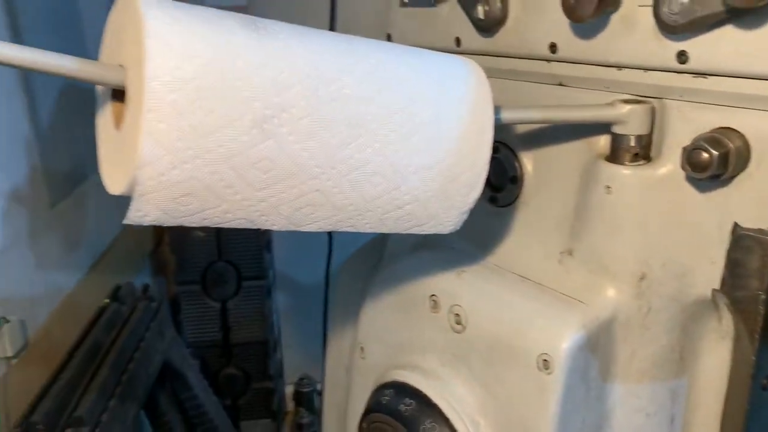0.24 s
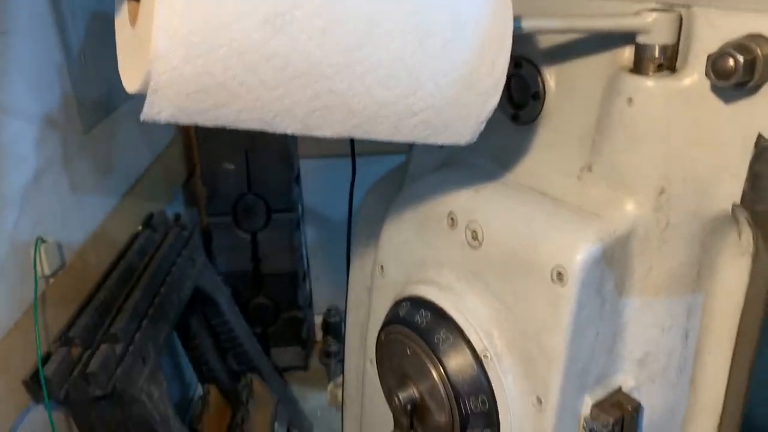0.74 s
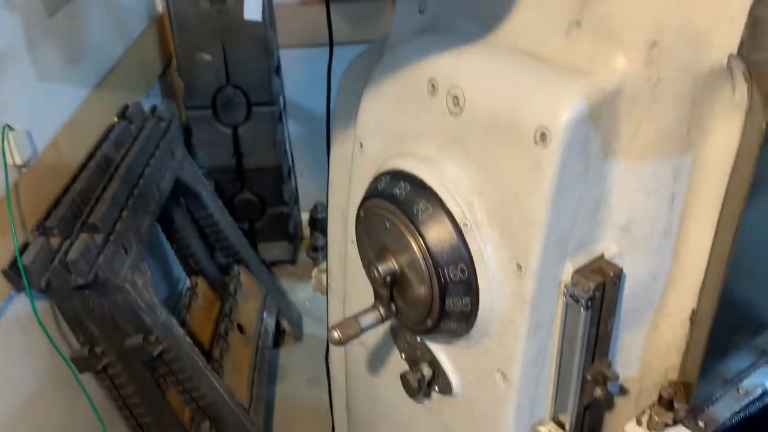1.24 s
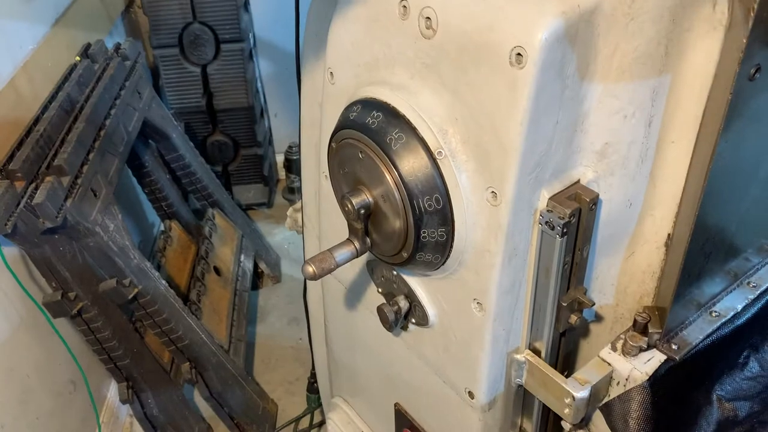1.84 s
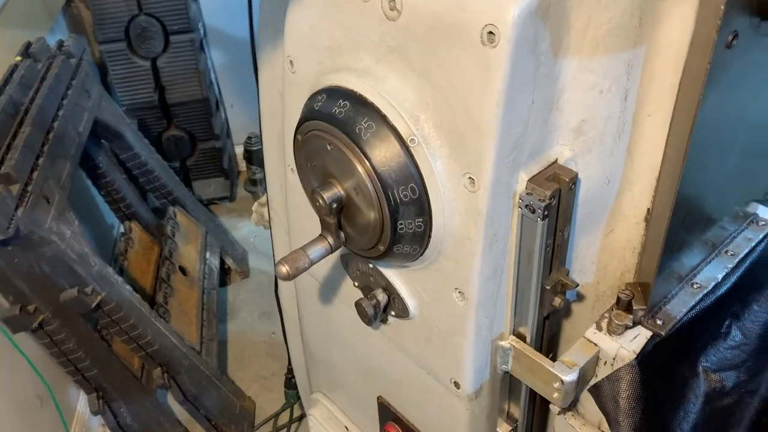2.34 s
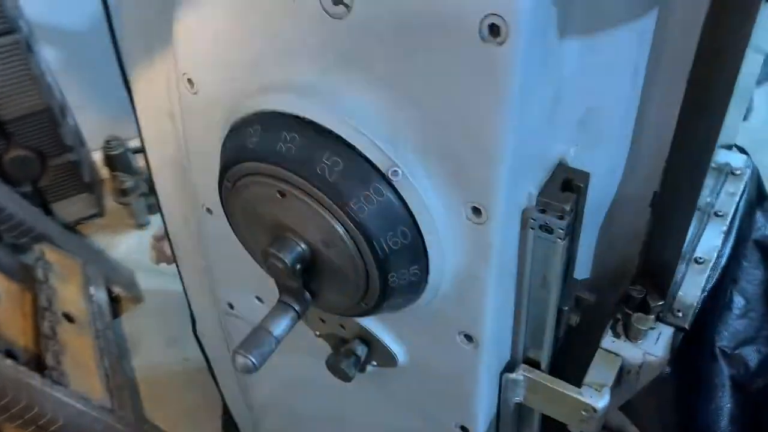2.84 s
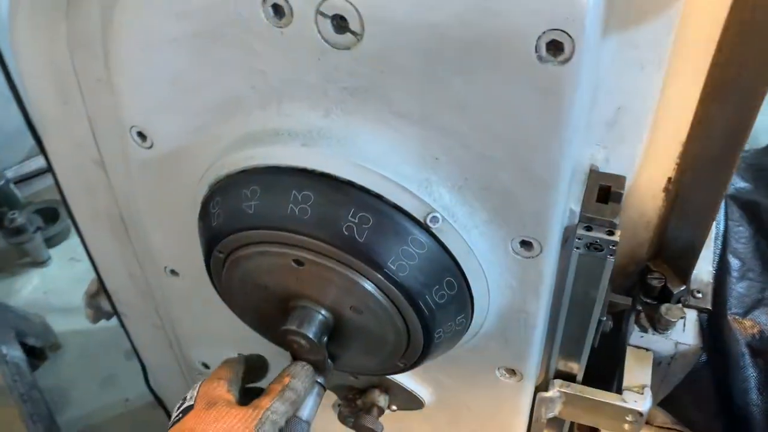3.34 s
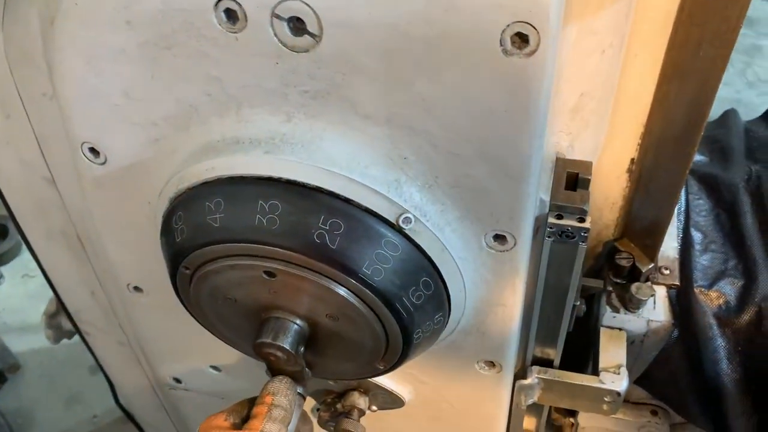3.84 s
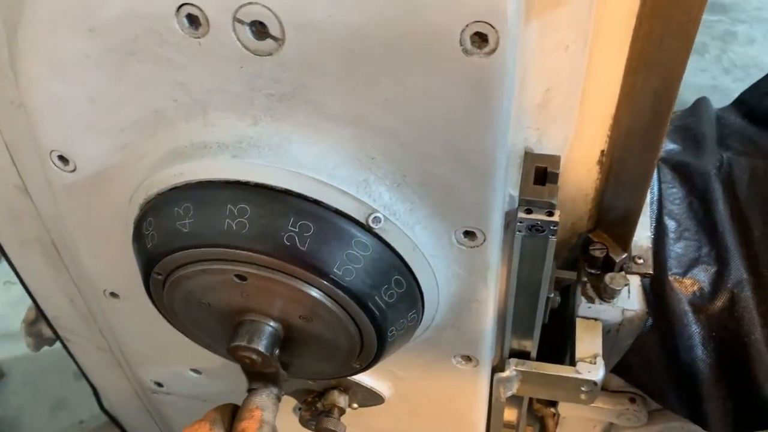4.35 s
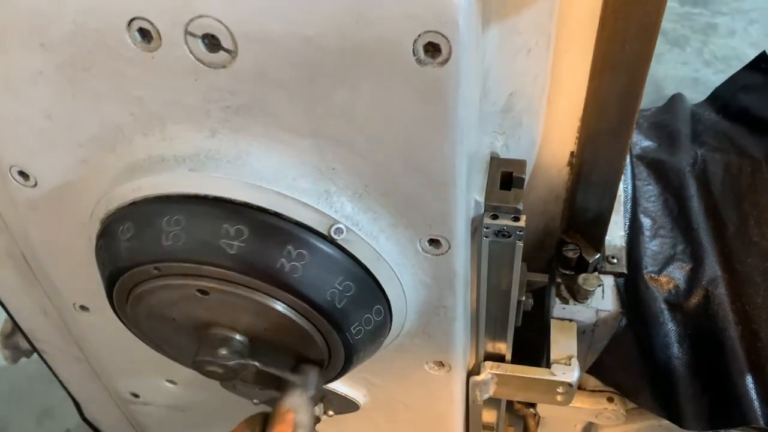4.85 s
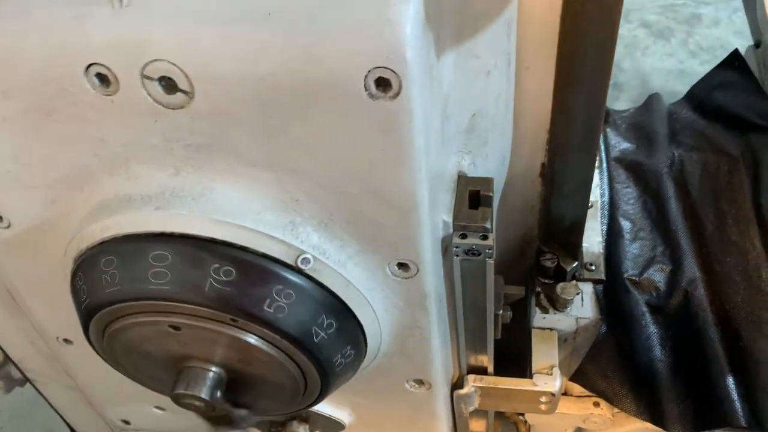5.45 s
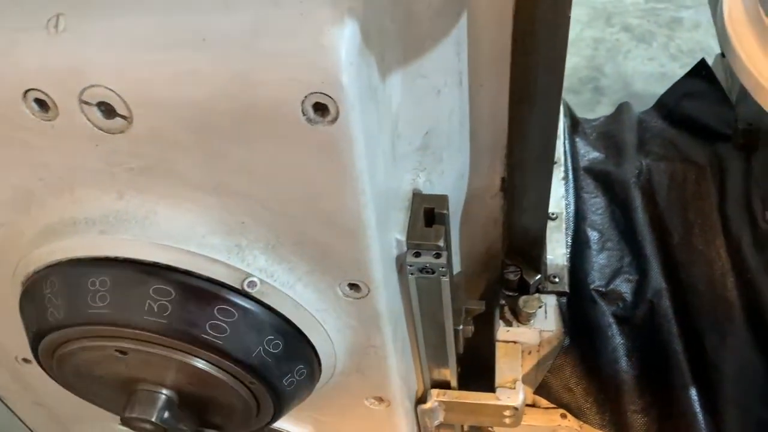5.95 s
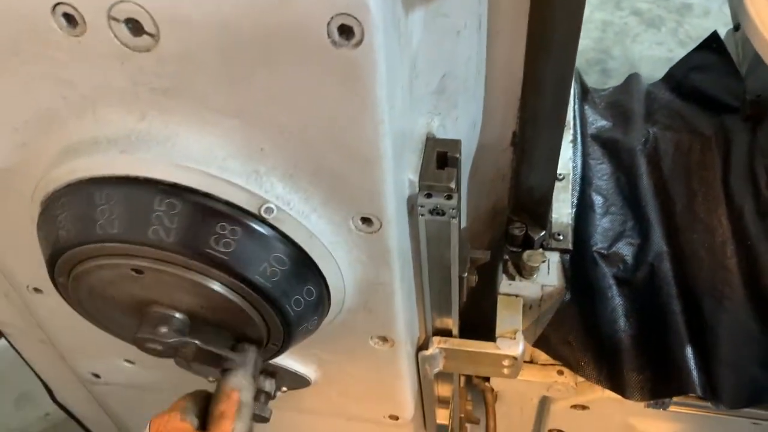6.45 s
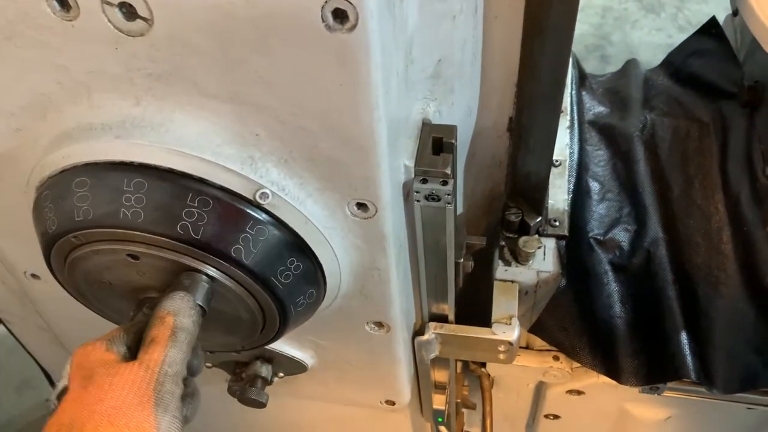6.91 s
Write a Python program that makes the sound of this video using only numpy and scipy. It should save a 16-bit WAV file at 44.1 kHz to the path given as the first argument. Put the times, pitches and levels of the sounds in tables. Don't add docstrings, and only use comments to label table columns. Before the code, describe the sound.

A geared milling machine idles throughout in a small workshop, close and loud on a handheld stereo microphone. A dense mid-range roar carries several steady singing gear tones, pulsing slightly with each shaft turn, while a thin high motor whine swells and fades unevenly. A belt joint gives short, bright puffs of air about every 0.2 seconds, partly masked at first and clearer as the microphone is lowered during the first 2.5 seconds. Around 2.5 to 3 seconds it steps closer and the tone balance shifts. A faint metallic touch comes at 2.9, then a glove rubs briefly at 3.3. A dry crack sounds at 4.0, the loudest steel clink at 5.0 with a short rub after it, faint ticks and rattles with a soft rub near 6.1, and a last loud clink at 6.65 followed by another rub. The machine keeps running unchanged to the end, around 7.2 seconds.

```python
import sys
import numpy as np
from scipy import signal
from scipy.fft import rfft, irfft
from scipy.io import wavfile
from scipy.ndimage import uniform_filter1d

SR = 44100
rng = np.random.default_rng(int(sys.argv[2]) if len(sys.argv) > 2 else 0)


def gain_from_db(level_db):
    decades = np.asarray(level_db, float) / 20
    return 10 ** decades


def output_pcm(signal):
    pcm = np.clip(np.atleast_2d(signal).T, -1, 1) * 32767
    wavfile.write(sys.argv[1], SR, np.round(pcm).astype(np.int16))


N = 316638
TURN = 3780

MESH_ORDERS = [21, 42, 49, 68, 98]
# pitch_hz [Hz], share [0-1]
REPEATS = [(100, 0.14), (300, 0.35), (700, 0.22), (1200, 0.28), (1800, 0.05), (2400, 0.42), (3200, 0.05),
           (4500, 0.37)]


def evened(x):
    return x / np.sqrt(np.mean(abs(x) ** 2) + 1e-20)


def read(points, hz):
    f, value = np.transpose(points)
    return np.interp(np.log(hz + 1), np.log(f + 1), value)


def add(mix, s, sound):
    part = mix[round(s * SR):][:len(sound)]
    part += sound[:len(part)]


def band(x, lo_hz, hi_hz):
    return signal.sosfilt(signal.butter(2, [lo_hz, min(hi_hz, SR / 2.1)], "band", fs=SR, output="sos"), x)


def bump(t, s, width_s):
    return np.exp(-((t - s) / width_s) ** 2)


def spot(t):
    # time_s [s], spot [0-3]
    walk = [
        (0, 0),
        (1.0, .5),
        (2.45, 1),
        (3.1, 2),
        (4.6, 2.1),
        (6.2, 3),
        (7.18, 3),
    ]
    return np.interp(t, *np.transpose(walk))


def between(values, t):
    return np.interp(spot(t), np.arange(len(values)), values)


def place_db(t, hz):
    corner_hz = [130, 500, 800, 1200, 1500, 2000, 4500, 9000]
    close_db = [2, 0, 0.5, -2, 0, 0, -.5, -1]
    turned_db = [0.17, 0.074, 0.11, 1.5, 1.6, 0.61, 0.27, 0]
    stepping_db = [1.5, 0, -2, 3.5, 1.5, 2.5, 1, 3]
    close = np.clip(spot(t) - 1, 0, 1) - .5
    turned = np.clip(spot(t) - 2, 0, 1)
    stepping = bump(t, 2.7, .3)
    curves = ((close, close_db), (turned, turned_db), (stepping, stepping_db))
    return sum(np.outer(amount, np.interp(hz, corner_hz, db)) for amount, db in curves)


def field(t, hz):
    # pitch_hz [Hz], level_db [dB per Hz]
    roar_curve = [(40, -87), (58, -62), (200, -62), (400, -57), (900, -59.5), (1600, -59.5), (2100, -61.5),
                  (2700, -66), (3500, -70.5), (5000, -81), (7500, -89), (9500, -97), (12700, -100),
                  (15500, -114)]
    # pitch_hz [Hz], width_hz [Hz], level_db [dB over the roar]
    panels = [(81.6, 13, 7), (102, 12.5, -8.5), (165.5, 40, 3), (390, 104, 2.5), (482, 19, 4),
              (788.6, 28, 10.5), (1011, 54, 6), (1187, 23, 14.5), (1292, 48, 7.5), (1680, 120, 0.5),
              (1620, 14, 0.5), (1881, 41, 7.5), (1977.6, 25, 7), (2264, 57, 5), (2385, 33, 9),
              (2541, 27, -0.5), (2600, 32, 5.5), (5950, 250, 0)]
    # pitch_hz [Hz], level_db [dB]
    lean = [(60, 1), (200, -0.37), (700, 1), (2000, -0.42), (4000, -1.3), (6400, -1), (9000, 0)]
    panels_db = sum(db / (1 + (2 * (hz - f) / width_hz) ** 2) for f, width_hz, db in panels)
    lean_db = np.array([.5, -.5])[:, None, None] * read(lean, hz)
    return gain_from_db(read(roar_curve, hz) + panels_db + place_db(t, hz) + lean_db)


def port_lead(hz):
    return np.exp(2j * np.pi * np.maximum(hz - 6040, 0) / 5010)


def paired(z, t, hz):
    # pitch_hz [Hz], likeness [0-1]
    likeness = [(60, .97), (250, .92), (500, .7), (1200, .62), (2500, .6), (5500, .45), (6800, .65),
                (7700, .92), (16000, .92)]
    # pitch_hz [Hz], swing [cycles]
    swing = [(300, 0), (800, 0.052), (1500, 0.31), (5000, 0.44), (6300, 0.12), (7200, 0.032)]
    alike = np.clip(read(likeness, hz), 0, 1)
    echoes = np.sin(hz / 130 + t[:, None] / .6) + np.sin(hz / 47 - t[:, None] / .35)
    turned = port_lead(hz) * np.exp(2j * np.pi * read(swing, hz) * echoes)
    return np.array([z[0], alike * z[0] * turned + np.sqrt(1 - alike ** 2) * z[1]])


def heard(left_db, right_db, lag):
    return np.sqrt(2) * np.array([gain_from_db(left_db), gain_from_db(right_db) * np.exp(-2j * np.pi * lag)])


def drifting(turns, count, span):
    z = rng.standard_normal((turns + 200, count, 4)) @ np.array([[1, 0], [1j, 0], [0, 1], [0, 1j]])
    rate = np.fft.fftfreq(turns + 200)[:, None, None]
    smoothing = np.exp(-(rate * span[:, None]) ** 2)
    z = np.fft.ifft(np.fft.fft(z, axis=0) * smoothing, axis=0)[:turns]
    return (z / np.sqrt(np.mean(abs(z) ** 2, axis=0))).transpose(2, 0, 1)


def roar():
    patchy_db, throb_db, tight_spot_turns = 1.8, 1.4, 0.797
    frames, hz = N // 512 + 5, np.fft.rfftfreq(2048, 1 / SR)
    t = (np.arange(frames) - 2) * 512 / SR
    a, b, c, d, patches = rng.standard_normal((frames, len(hz), 5)).transpose(2, 0, 1)
    patches = uniform_filter1d(patches, size=10, axis=0)
    patches = evened(uniform_filter1d(patches, size=14, axis=1))
    z = paired(np.array([a + 1j * b, c + 1j * d]), t, hz) * field(t, hz)
    z *= gain_from_db(patchy_db * patches) * np.sqrt(1 - np.clip(read(REPEATS, hz), 0, 1))
    noise = signal.istft(z.transpose(0, 2, 1), nperseg=2048, noverlap=1536)[1][:, :N]
    noise *= np.sqrt(SR / 2048 * 1.5)
    return noise * gain_from_db(throb_db * np.cos(2 * np.pi * (np.arange(N) / TURN - tight_spot_turns)))


def motor():
    slot_hz = [5919.2, 6278.6]
    # [dB, left minus right]
    lower_swells = [(0.0, -57, -4), (0.5, -52, -7), (1.08, -64, -7), (1.48, -49, -9), (2.1, -54, -6),
                    (2.38, -48, -3), (2.58, -61, -9), (2.7, -47, -6), (2.9, -64, -2), (3.66, -50, -4),
                    (4.12, -58, -2), (4.58, -50, -4), (4.9, -62, 1), (5.68, -50, -10), (5.96, -62, -4),
                    (6.28, -48, -14), (6.5, -56, -11), (7.16, -55, -16)]
    upper_swells = [(0.0, -59, -1), (1.18, -64, -4), (1.28, -56, -4), (1.5, -54, 2), (2.84, -64, -8),
                    (3.14, -50, -2), (3.46, -64, -7), (4.18, -64, -11), (4.62, -48, -5), (4.86, -58, -2),
                    (5.08, -50, -2), (5.36, -62, -2), (5.82, -53, -14), (6.14, -64, -6), (6.48, -54, 1),
                    (6.62, -64, 0), (6.72, -55, -1), (7.16, -62, 0)]
    slot_lags = [(0, .05, -.15, .36), (.1, .1, -.1, -.27)]
    # pitch_hz [Hz], level_db [dB]
    sidebands = [(5799.3, -64), (6039.1, -63), (6158.8, -63), (6398.6, -67)]
    # pitch_hz [Hz], level_db [dB]
    overtones = [(10207, -80), (10939, -91), (11962, -76), (12199, -76)]
    waver_hz = 1.0
    t = np.arange(N) / SR
    fades = drifting(80, 6, np.full(6, 14.))
    fades = np.array([[np.interp(t, np.arange(80) / 10, tone) for tone in side.T] for side in fades])
    out = np.zeros((2, N))
    for k, (hz, swells, lags) in enumerate(zip(slot_hz, (lower_swells, upper_swells), slot_lags)):
        s, db, pan_db = np.transpose(swells)
        level = np.interp(t, s, gain_from_db(db + 0.3))
        pan_db = np.interp(t, s, pan_db)
        gains = heard(pan_db / 2, -pan_db / 2, between(lags, t))
        gains *= level * np.sqrt(2) / np.maximum(abs(gains.mean(0)), .5)
        cycles = np.cumsum(hz + waver_hz * fades[0, -1 - k].real) / SR
        out += (gains * np.exp(2j * np.pi * cycles)).real
    for k, (hz, db) in enumerate(sidebands):
        out += (np.sqrt(2) * gain_from_db(db) * fades[:, k] * np.exp(2j * np.pi * hz * t)).real
    for hz, db in overtones:
        out += np.sqrt(2) * gain_from_db(db) * np.sin(2 * np.pi * hz * t)
    return out


def belt():
    first_pass_s, lap_s = .1393, .21058
    second_puff_s, tail_db, tail_t60_s = 0.0048, -3.0, 0.26
    out, t = np.zeros(N), np.arange(6000) / SR
    tail = gain_from_db(tail_db - 60 * t / tail_t60_s) * np.minimum(t / 0.0044, 1)
    first = bump(t, .003, 0.0021)
    second = bump(t, .003 + second_puff_s, 0.0034)
    for s in np.arange(first_pass_s, N / SR, lap_s):
        hidden_db = -6.5 * max(1 - spot(s), 0)
        db = -41 + hidden_db + 1.8 * rng.standard_normal()
        body_db = -45 + 0.4 * hidden_db - db
        air = rng.standard_normal((3, len(t)))
        top = (0.7 * first + second + tail) * evened(band(air[0], 13000.0, 15200.0))
        middle = (0.4 * first + second + 1.5 * tail) * evened(band(air[1], 6200.0, 13700.0))
        low = (.5 * first + second + 0.99 * tail) * evened(band(air[2], 4100.0, 8800.0))
        puff = top + gain_from_db(body_db + 4.5) * middle + gain_from_db(-3.0) * low
        add(out, s - .004, gain_from_db(db - 5.0) * puff)
    return out


def column_scatter(puffs):
    scatter = rng.standard_normal((2, 200)) * gain_from_db(-60 * np.arange(200) / 300)
    scatter *= .4 / np.linalg.norm(scatter[0])
    return signal.oaconvolve(puffs[None], scatter, axes=1)[:, :N]


def meshes(t):
    # left_db [dB], right_db [dB], lag [cycles, right]
    waves_high = [(-44, -40, -.03), (-32.5, -31.5, -0.094), (-35.5, -39, -0.33), (-30.5, -32, 0.063),
                  (-32.5, -58, -.1)]
    waves_low = [(-43.5, -41, -0.12), (-35, -35, .03), (-35, -37.5, -.27), (-25.5, -27.5, -0.1),
                 (-34, -45, -.1)]
    waves_close = [(-36.5, -36, -0.066), (-36, -31.5, 0.027), (-29.5, -35, 0.13), (-24, -29.5, 0.11),
                   (-36.5, -41.5, 0.0012)]
    waves_turned = [(-36, -35.5, -.085), (-34.5, -31, 0.032), (-32, -43, 0.097), (-23, -34.5, 0.23),
                    (-44, -46, -.25)]
    # time_s [s], width_s [s]
    passing = [(2.87, .17), (2.62, .18)]
    # left_db [dB], right_db [dB], lag [cycles, right]
    changes = [(-3.5, -16, .25), (5, 11, .05)]
    spots = np.transpose([waves_high, waves_low, waves_close, waves_turned], axes=(1, 2, 0))
    tones = np.array([[between(v, t) for v in tone] for tone in spots])
    for order, (s, width_s), change in zip((68, 98), passing, changes):
        tones[MESH_ORDERS.index(order)] += np.outer(change, bump(t, s, width_s))
    return [heard(*tone) for tone in tones]


def gears():
    # order [x shaft speed], level_db [dB]
    uneven_teeth = [(20, -57), (22, -40.5), (27, -48.5), (30, -48.5), (39, -43.5), (48, -43.5), (52, -47),
                    (84, -45), (85, -43.5), (95, -38.5), (96, -41.5), (97, -40.5), (99, -40), (100, -43.5),
                    (101, -39), (107, -41), (108, -44), (109, -36.5), (110, -46.5), (111, -45),
                    (112, -48.5), (114, -38.5), (136, -54), (144, -41.5), (145, -48), (146, -47),
                    (147, -40), (148, -45), (149, -46.5), (152, -45)]
    wander_turns, clear_db = 58.5, -0.67
    turns, count = N // TURN + 2, 420
    t, hz = np.arange(turns) * TURN / SR, np.arange(count) * SR / TURN
    chance = paired(drifting(turns, count, wander_turns * (680.0 / (hz + 360.0))), t, hz)
    z = chance * field(t, hz) * np.sqrt(2 * np.clip(read(REPEATS, hz), 0, 1) * SR / TURN)
    moved_db = place_db(t, hz)
    for order, db in uneven_teeth:
        k = int(order)
        z[:, :, k] = chance[:, :, k] * np.sqrt(2) * gain_from_db(db + clear_db + moved_db[:, k])
    for order, gains in zip(MESH_ORDERS, meshes(t)):
        z[:, :, order] = gains * np.exp(2j * np.pi * rng.random())
    for side, db in ((-1, -14.5), (1, -4.5)):
        beat = z[:, :, 21] * gain_from_db(db) * np.exp(-2j * np.pi * side * .68)
        z[:, :, 21 + side] = beat + .4 * z[:, :, 21 + side]
    waves = irfft(z, TURN) * TURN / 2
    fade = np.arange(TURN) / TURN
    return (waves[:, :-1] * (1 - fade) + waves[:, 1:] * fade).reshape(2, -1)[:, :N]


def glove():
    # start_s [s], length_s [s], start_db [dB], end_db [dB]
    strokes = [
        (3.3, .22, -52, -59),
        (5.04, .18, -54.5, -67),
        (6.057, 0.15, -55, -53),
        (6.69, 0.13, -50, -59),
    ]
    rise_s, fall_db_per_s = .04, 300
    t = np.arange(N) / SR
    level = np.zeros(N)
    for s, length, start_db, end_db in strokes:
        held_db = np.interp(t, [s, s + length], [start_db, end_db])
        held_db -= fall_db_per_s * np.maximum(t - s - length, 0)
        level += gain_from_db(held_db) * np.clip((t - s) / rise_s + .5, 0, 1)
    air, grain = rng.standard_normal((2, N))
    squeak = 2.2 * band(air, 9300.0, 10300.0) + .6 * band(air, 8000., 14800.0)
    squeak += 1.2 * band(air, 14700., 15600.)
    return evened(squeak * gain_from_db(4.5 * evened(uniform_filter1d(grain, size=300)))) * level


def dial():
    # [dB, modes under 8.5 kHz]
    clinks = [
        (2.8608, -31, .6, -12, 16),
        (4.0283, -15.5, .1, -5, -1),
        (5.0235, -7.5, .9, -11, 3),
        (6.054, -35, .5, -20, 14),
        (6.103, -33, 1.2, -20, -6),
        (6.125, -36, 1.2, -20, -6),
        (6.6516, -9, 1.2, -16, 1),
    ]
    # pitch_hz [Hz], level_db [dB], t60_s [s]
    modes = [(6020, -14.5, 0.019), (7630, -19, 0.013), (9620, 3, 0.0084), (12100, -10, 0.0124),
             (15230, -12, .01)]
    # delay_s [s], level_db [dB]
    bounces = [(.0062, -11), (.012, -18), (.021, -20)]
    tail_db, tail_t60_s = -26.5, 0.18
    out, t = np.zeros(N), np.arange(8000) / SR
    for s, db, ring, crack_db, low_db in clinks:
        ringing = sum(gain_from_db(mode_db + low_db * (hz < 8500) - 60 * t / t60) * np.sin(2 * np.pi * hz * t)
                      for hz, mode_db, t60 in modes)
        strike = ring * ringing * np.minimum(t / 0.00094, 1)
        noise = rng.standard_normal(len(t))
        crack = evened(band(noise, 4800.0, 14500.0) + 1.3 * band(noise, 1900.0, 5300.0))
        crack *= gain_from_db(crack_db - 60 * t / 0.0153)
        rattle = 2 * band(noise, 8070.0, 10000.0) + 0.62 * band(noise, 10000.0, 12600.)
        rattle = evened(rattle + band(noise, 14800.0, 15300.0))
        rattle *= (0.19 + ring) * gain_from_db(tail_db - 60 * t / tail_t60_s)
        add(out, s, gain_from_db(db) * (strike + crack + rattle))
        for after, bounce_db in bounces:
            add(out, s + after, gain_from_db(db + bounce_db) * ring * strike)
    return out


def scene():
    puffs = belt()
    bright = puffs + dial() + glove()
    ahead = irfft(rfft(bright) * port_lead(np.fft.rfftfreq(N, 1 / SR)), N)
    ports = np.array([bright, ahead]) + column_scatter(puffs)
    return roar() + motor() + gears() + ports


def band_limit(x):
    return signal.sosfilt(signal.butter(12, 16990, fs=SR, output="sos"), x)


def record(dry):
    thinned = signal.sosfilt(signal.butter(4, 52, "high", fs=SR, output="sos"), dry)
    limited = signal.oaconvolve(thinned, signal.firwin(255, 15800, fs=SR)[None], "same")
    return band_limit(limited)


dry = scene()
out = record(dry)
output_pcm(out)
```